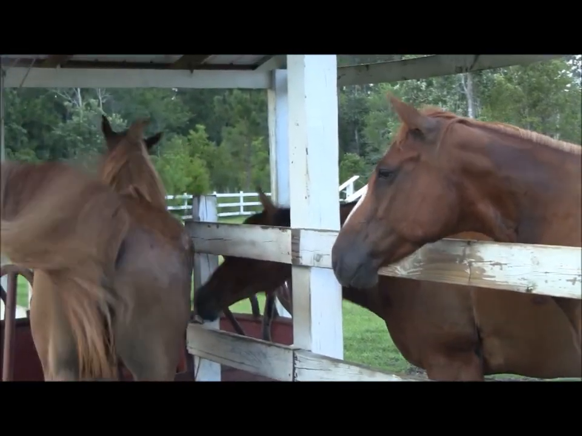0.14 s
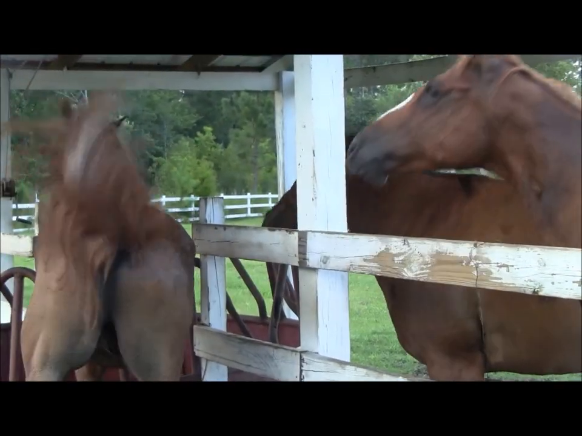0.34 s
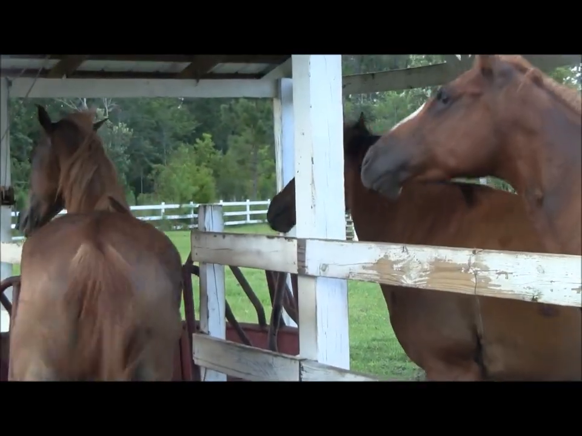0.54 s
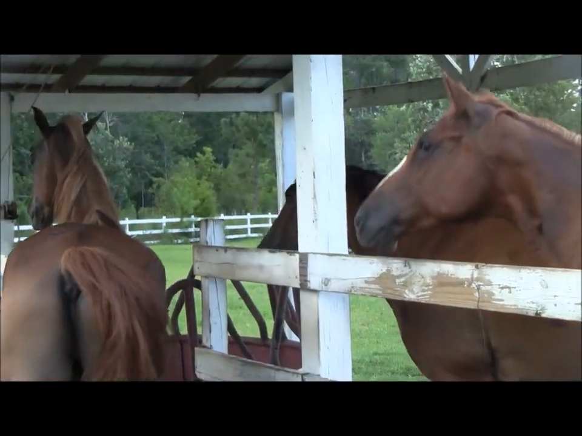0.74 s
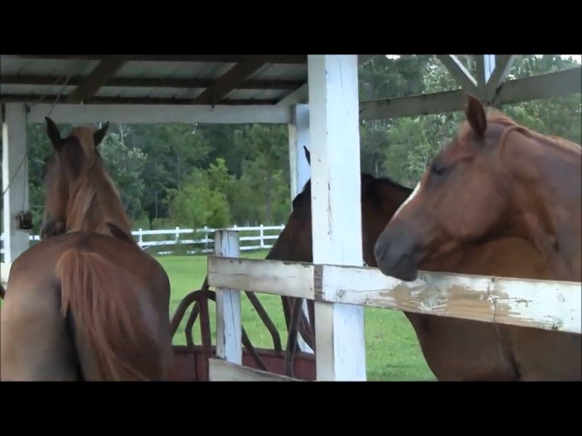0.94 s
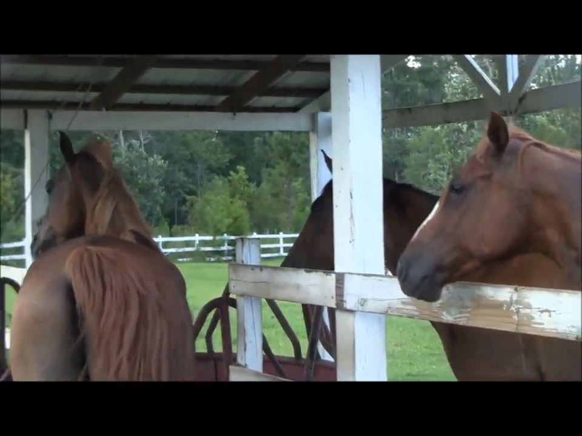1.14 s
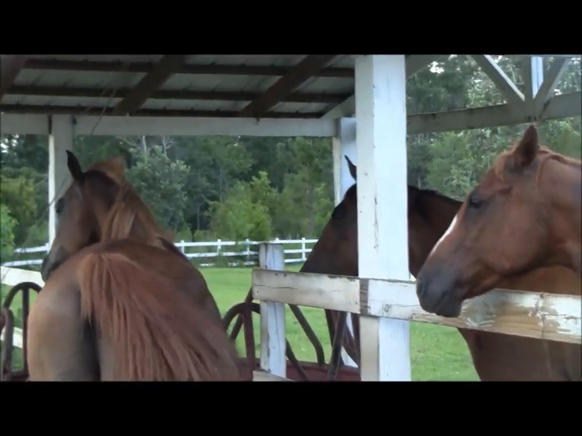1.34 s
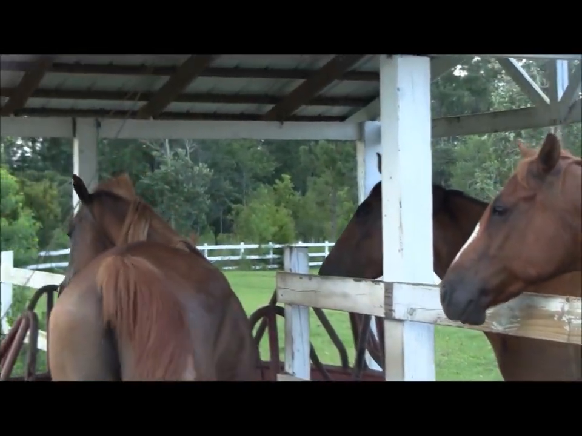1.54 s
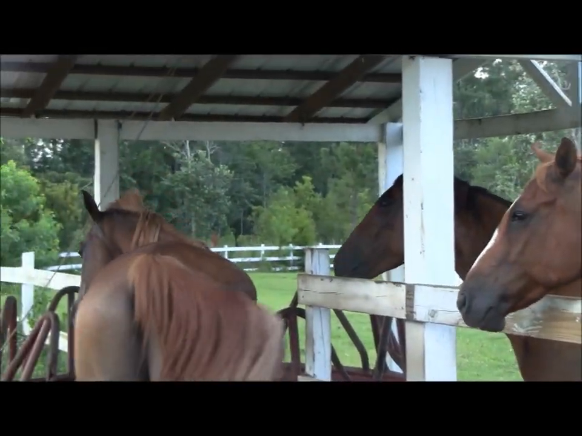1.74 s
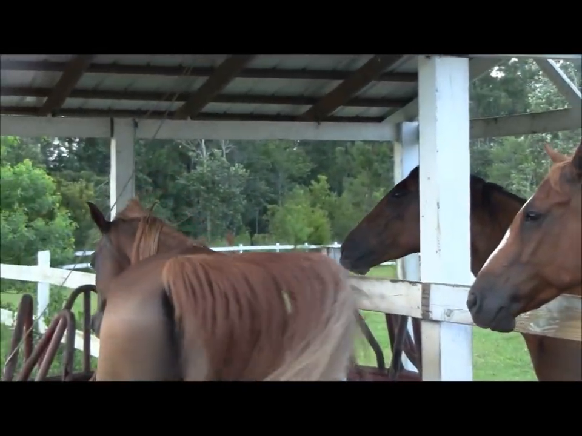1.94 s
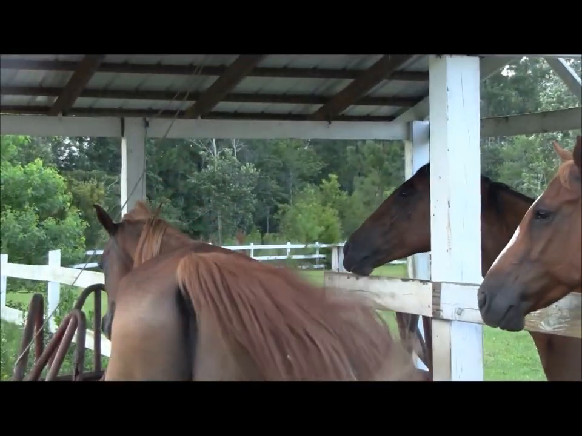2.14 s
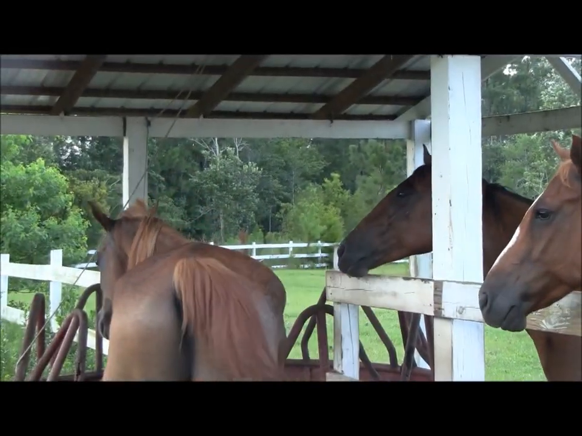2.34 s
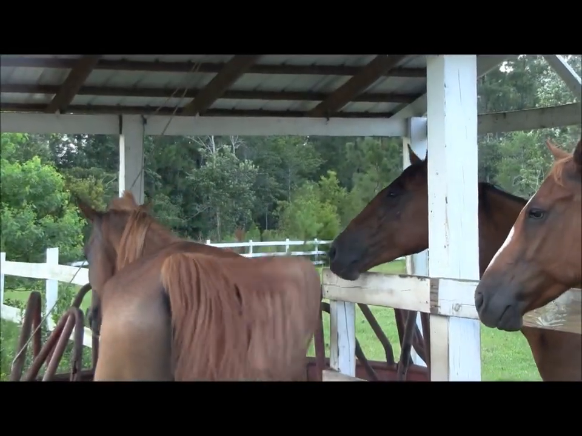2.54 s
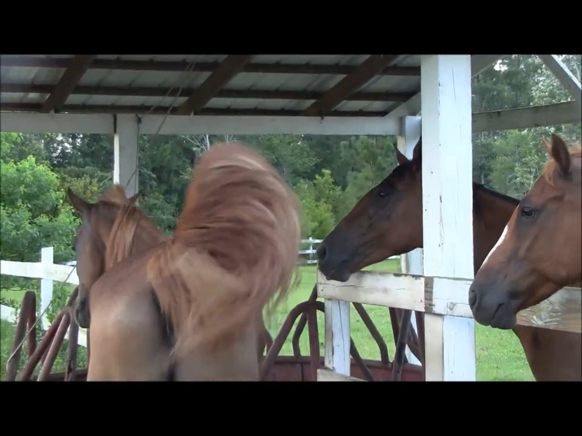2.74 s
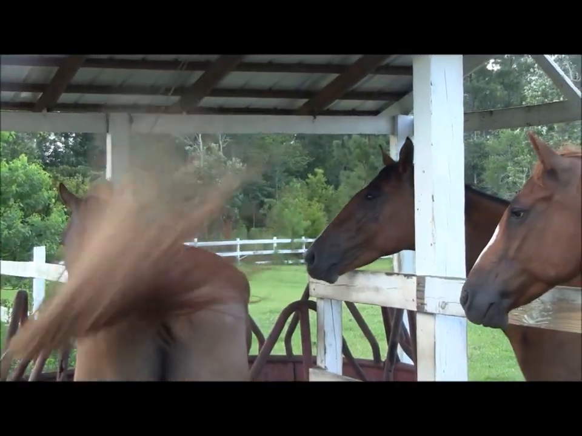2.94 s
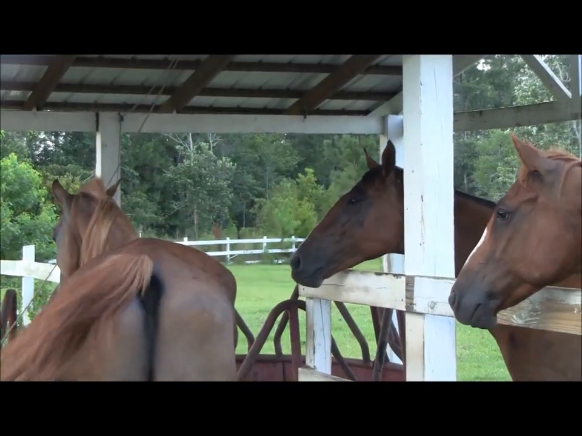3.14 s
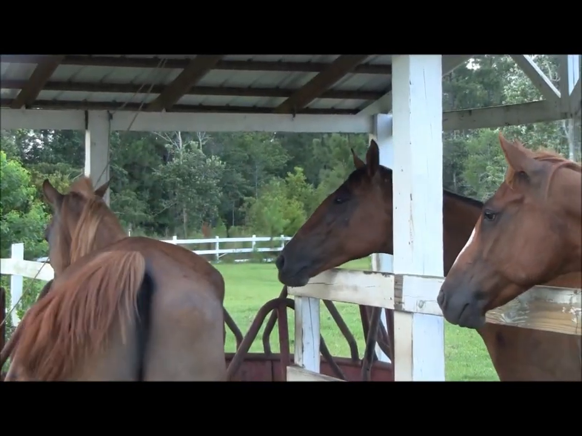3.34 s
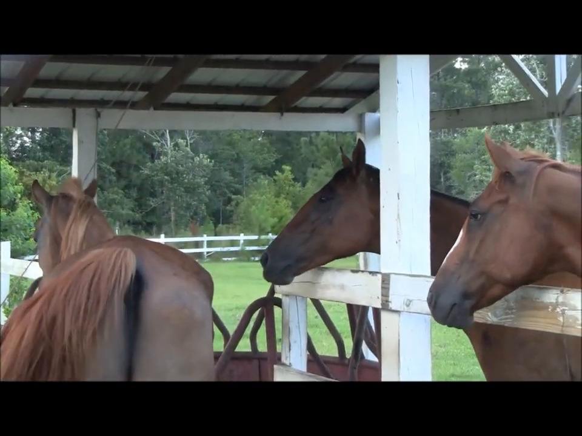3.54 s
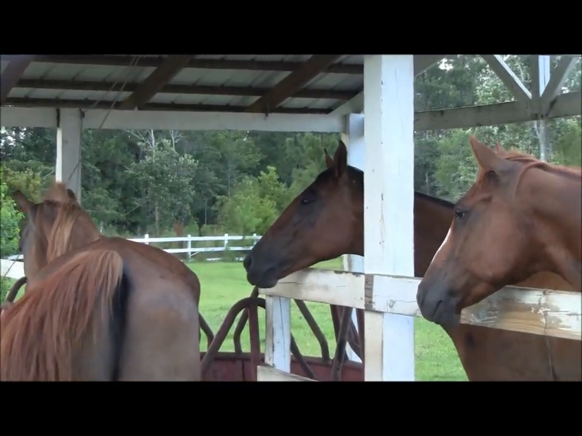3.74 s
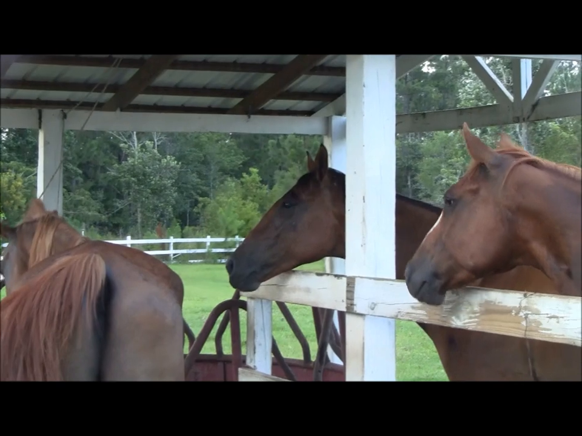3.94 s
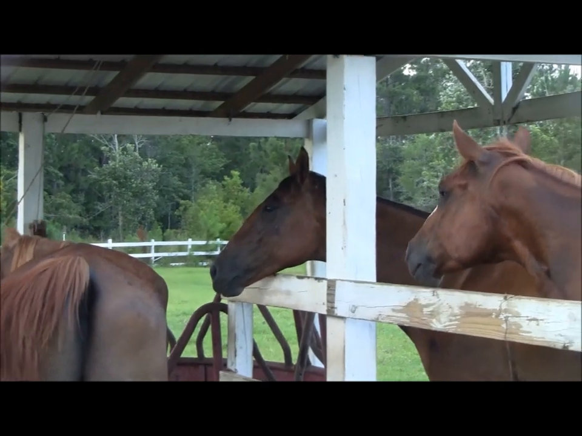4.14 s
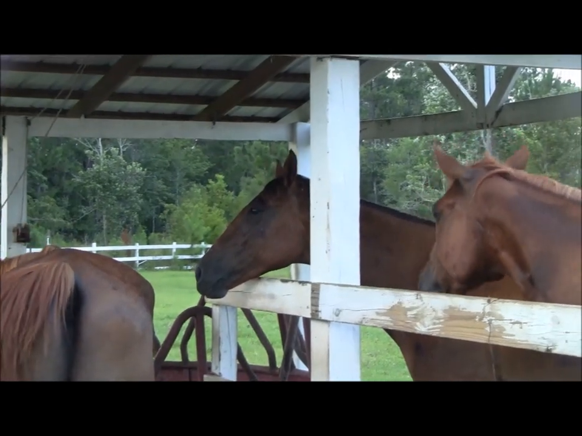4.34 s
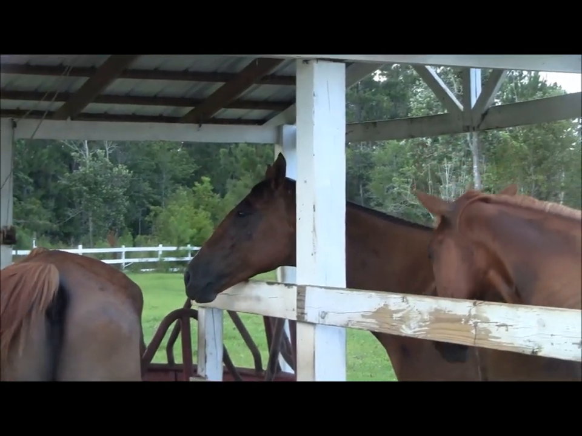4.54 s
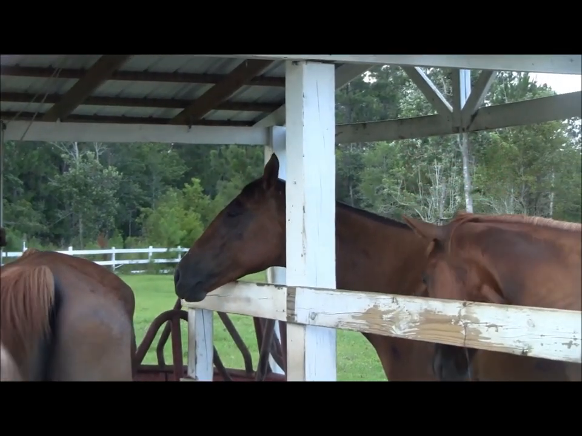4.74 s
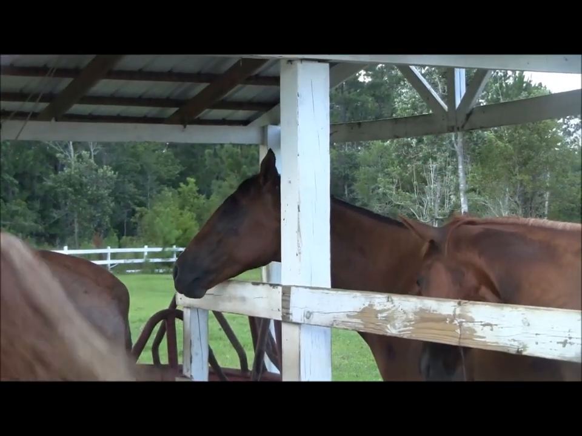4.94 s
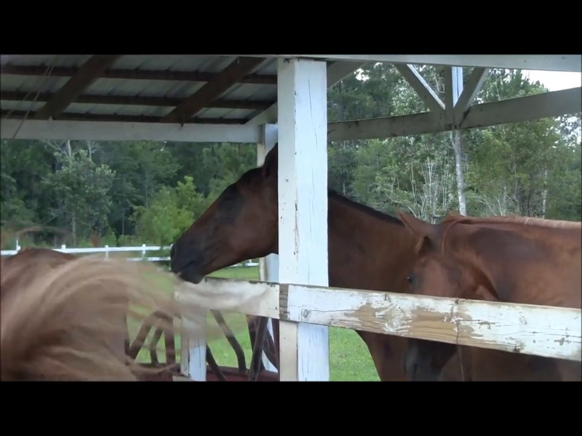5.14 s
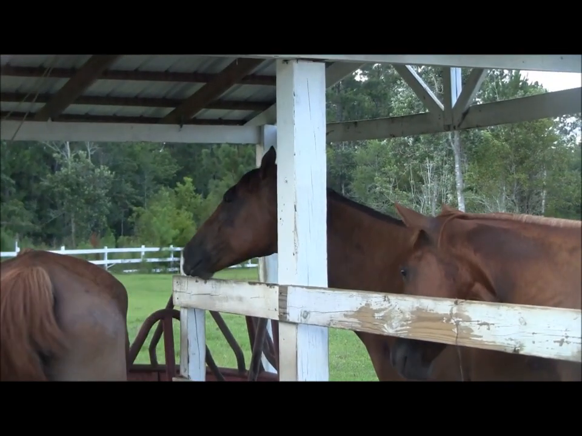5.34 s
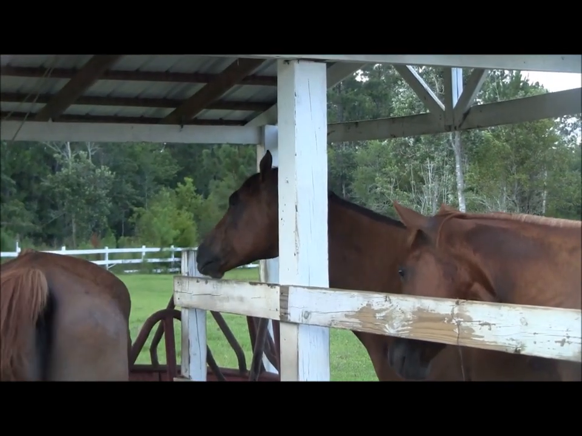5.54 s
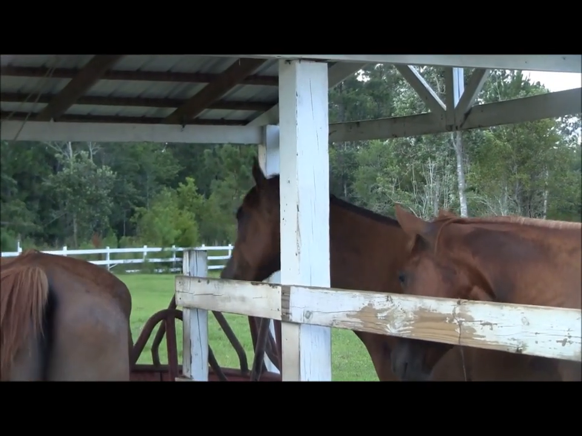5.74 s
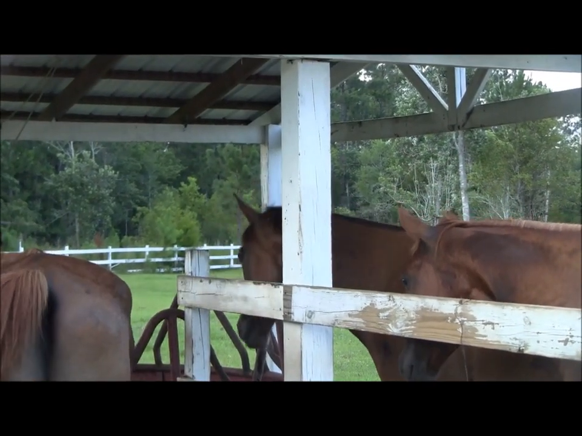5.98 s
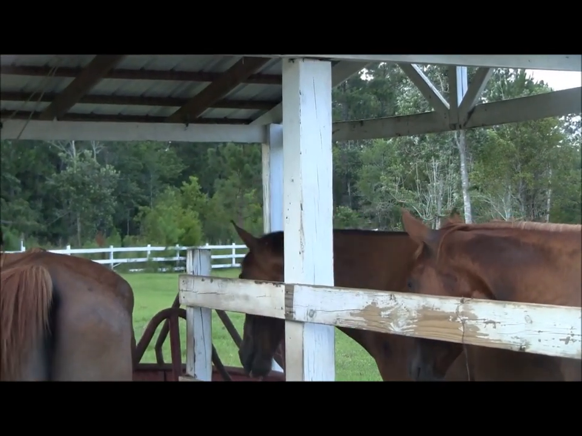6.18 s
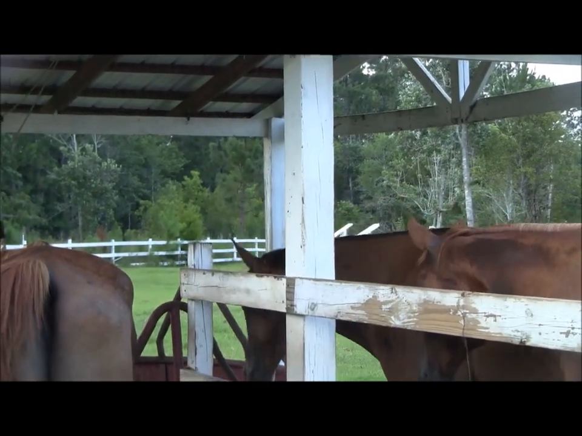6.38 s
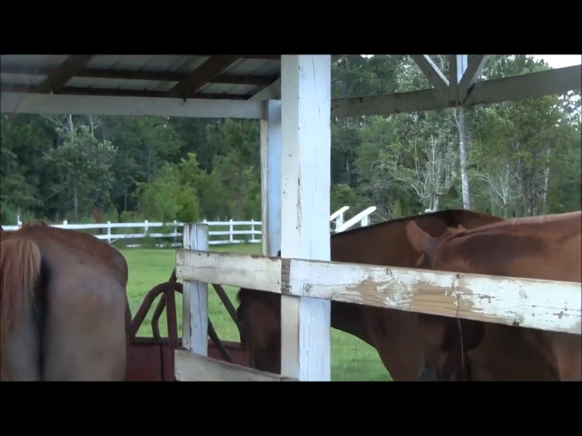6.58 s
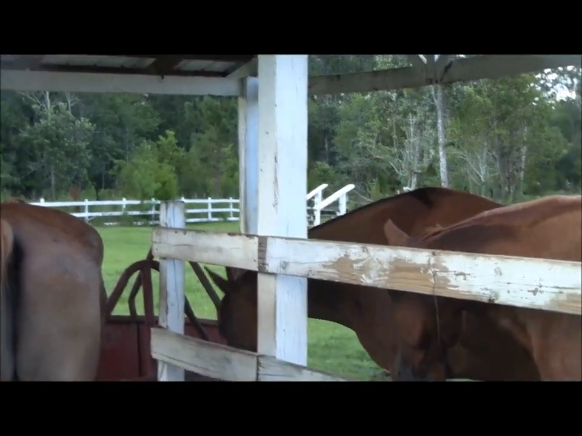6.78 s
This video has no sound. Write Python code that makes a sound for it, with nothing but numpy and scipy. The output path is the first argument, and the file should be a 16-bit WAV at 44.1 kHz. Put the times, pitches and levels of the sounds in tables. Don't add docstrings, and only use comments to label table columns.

```python
import sys
import numpy as np
from scipy import signal
from scipy.io import wavfile
from scipy.ndimage import uniform_filter1d

SR = 44100
rng = np.random.default_rng(int(sys.argv[2]) if len(sys.argv) > 2 else 0)


def generate_wav(signal):
    frames = np.transpose(np.atleast_2d(signal))
    scaled = np.clip(frames, -1, 1) * 32767
    pcm = np.round(scaled).astype(np.int16)
    wavfile.write(sys.argv[1], SR, pcm)


def magnitude_from_level(level_db):
    exponent = np.asarray(level_db, float) / 20
    return 10 ** exponent


N = 300321
T = np.arange(N) / SR
VOICE = T[:SR]

# (frequency [Hz], level [dB per Hz])
TRAFFIC = [(160, -32), (280, -5), (382, -3), (555, -5), (901, 0), (1080, -3.5), (1400, -32.5), (2380, -120)]
TYRES = [(640, -36), (1080, -3), (1300, -0.5), (1880, -11), (2100, -15), (2730, -26.5), (4620, -120)]
LEAVES = [(1240, -9), (2100, -4), (3460, -9), (4110, -11), (4730, -12), (5340, -16.5), (6400, -14.5),
          (8320, -43), (14100, -120)]
HUM = [(15, -70), (44, -50), (70, -17), (100, -13), (124, 2), (140, -0.5), (162, -7.5), (200, -1),
       (251, -8.5), (300, -10.5), (390, -41), (660, -120)]
FAR_INSECTS = [(3530, -57), (6000, -32), (6470, -27.5), (6790, -7), (7530, -7), (7960, -7), (8560, -7),
               (9450, 1.5), (10000, -2.5), (11400, -25), (11900, -45.5), (12000, -57), (13200, -60),
               (14400, -45), (15600, -53)]
# (frequency [Hz], left-right correlation [-1 to 1], lead of the left [rad])
PORTS = [(60, .97, 0), (150, .94, 0), (230, .3, 0), (300, -.35, 0), (450, -.45, 0), (700, .25, .3),
         (1200, .86, .3), (2500, .55, .2), (4700, .55, .2), (7000, .65, 0), (8000, .6, .4), (8800, .6, 2),
         (10000, .55, 2.1), (12000, .45, .8)]
# (nearest [s], half length [s], level [dB])
CARS = [
    (.8, .15, 3),
    (2.9, .4, 3.5),
    (3.68, .24, 7),
    (4.3, .1, 2.5),
    (5.3, .45, 3.5),
]
# (frequency [Hz], level [dB per Hz])
HAIR = [(1470, -37), (2500, -5.5), (3900, -12.5), (6360, -9.5), (7820, -6.5), (8500, -3), (12000, -5.5),
        (15600, -15)]
DIRT = [(59, -44), (100, -8.5), (633, -4), (831, -12), (1160, 0), (1430, -21.5), (1660, -2), (2800, -6),
        (4500, -13), (7830, -27), (15000, -46)]
# (fastest [s], peak [dB], time to rise 20 dB [s], time to fall 20 dB [s])
SWISHES = [(.14, -58, .05, .3), (.47, -65.5, .25, .25), (.6, -60, .12, .25), (.68, -59, .2, .14),
           (1.0, -71, .3, .26), (1.4, -67, .12, .15), (1.52, -63, .11, .08), (1.7, -69, .12, .12),
           (1.917, -61, .03, .07), (1.98, -69, .2, .12), (2.5, -67, .08, .05), (2.67, -62, .05, .05),
           (2.8, -69, .28, .2), (3.033, -51.5, .06, .05), (3.07, -57, .15, .04), (3.12, -64, .15, .15),
           (3.16, -55, .05, .12), (3.26, -62, .15, .06), (4.5, -75, .6, .03), (4.98, -70, .55, .05),
           (5.018, -53, .025, .09), (5.07, -57, .05, .15), (5.1, -58, .2, .025), (5.372, -53, .025, .07),
           (5.41, -55, .04, .05), (5.46, -65, .1, .05), (5.54, -63, .12, .1), (5.575, -53, .03, .03),
           (5.62, -62, .15, .035), (6.045, -66, .03, .05), (6.11, -75, .24, .08), (6.21, -79.5, .1, .1),
           (6.72, -75, .2, .15)]
# (start [s], length [s], level [dB])
SCUFFS = [
    (.125, .08, -33),
    (1.365, .07, -51),
    (.67, .03, -55),
    (3.045, .07, -57),
    (5.006, .04, -48),
    (5.054, .05, -51),
]
# (time [s], pitch [Hz], level [dB], second partial over the first [dB])
YELP = [(.152, 711, -38, -14), (.165, 693, -35, -6), (.19, 647, -25, 6), (.199, 640, -26, 8)]
NOTE = [(.2, 664.5, -40, 9), (.211, 669, -27, -6), (.224, 678, -12.5, -21), (.236, 664, -17.5, -10),
        (.27, 621, -16.5, -11), (.285, 626, -16, -12), (.297, 619, -14.5, -16), (.325, 604, -15.5, -16),
        (.34, 598, -23, -20)]
# (multiple of the pitch [1], level [dB])
UPPER = [(4, 2.5), (5, -3.5), (6, -8), (7, -13.5), (8, -18)]
# (frequency [Hz], width [Hz], level over the first [dB])
LIFT = [(1810, 18, -13), (2000, 40, -14)]
# (start [s],
# length [s], first pitch [Hz], last pitch [Hz], level [dB])
NOSE = [(.335, .04, 1614, 1590, -23), (.366, .03, 1555, 1520, -23), (.39, .05, 1510, 1490, -23),
        (.432, .03, 1480, 1490, -20), (.601, .048, 1480, 1455, -27), (.64, .03, 1460, 1450, -40),
        (.345, .045, 1740, 1700, -26), (.385, .05, 1805, 1785, -27), (.43, .07, 1795, 1715, -32),
        (.34, .055, 570, 545, -25), (.388, .045, 525, 500, -25), (.425, .065, 570, 620, -28),
        (.176, .035, 1965, 1925, -32), (.184, .04, 2610, 2560, -36), (.298, .06, 2460, 2415, -36),
        (.26, .06, 2950, 3080, -42), (.33, .085, 3500, 3400, -46), (.29, .05, 4380, 4250, -50),
        (.375, .04, 4300, 4200, -50), (.372, .07, 2745, 2700, -45), (.385, .05, 3900, 3900, -51),
        (.44, .055, 2450, 2480, -41), (.44, .05, 3460, 3460, -51), (.6, .045, 2620, 2560, -52),
        (.605, .035, 4550, 4500, -64), (.725, .04, 3950, 3900, -69)]
# (time [s], pitch [Hz], level [dB])
WHISTLE = [(.221, 1040, -24), (.287, 985, -38), (.322, 1040, -34), (.332, 1010, -15), (.375, 995, -16.5),
           (.412, 928, -19), (.432, 1022, -18.5), (.45, 1008, -22), (.462, 1015, -39)]
AFTER_TONE = [(.476, 1013, -37), (.49, 1010, -30), (.535, 1000, -38), (.56, 940, -46), (.591, 1017, -41),
              (.61, 1015, -37)]
# (multiple of the folds [1], multiple of the whistle [1], level over the whistle [dB])
MIXING = [(1, 1, 1), (-1, 2, 0), (2, 1, -9.5), (-1, 3, -26)]
# (time [s], effort [dB], noise share [0-1])
GROWL = [(.205, -31, .75), (.238, -27.5, .8), (.31, -33, .8), (.338, -20, .4), (.38, -23, .45),
         (.455, -23.5, .4), (.464, -31, .7), (.5, -36, .6), (.535, -46, .7)]
# (frequency [Hz], width [Hz], level [dB])
THROAT = [(410, 100, -12), (570, 114, -5.5), (735, 107, -2.5), (860, 100, -6.5), (1080, 140, -0.5),
          (1380, 260, -9), (1740, 200, -1), (2014, 30, -8.5), (2500, 130, -11), (3500, 660, -17.5),
          (4360, 600, -22.5), (6200, 1300, -30.5)]
# (start [s], pitch [Hz], level [dB], length [s], growling rasp [dB])
GRUNTS = [
    (.588, 569, -34.5, .062, -45),
    (.72, 552, -39, .038, -52),
]
# (time [s], peak [dB], top end over the peak [dB])
SNAPS = [
    (0.679, -42, -12),
    (1.9133, -34, -22),
    (2.6564, -61, -8),
    (4.459, -33.5, -26),
    (5.012, -33.5, -9),
    (5.0668, -32, -14),
    (5.368, -45, -1),
    (5.5722, -37, -8),
    (6.0364, -38.5, -14),
]
# (time [s], pitch [Hz], level [dB])
BIRD = [(6.28, 3700, -80), (6.31, 3520, -65), (6.36, 3270, -65), (6.4, 3070, -68), (6.42, 2960, -80),
        (6.44, 2850, -65), (6.48, 2660, -59), (6.565, 2220, -57), (6.578, 2160, -76)]

FULL_DB, DUCK_S, DUCK_DB, DEEPEST_S, DEEPEST_DB = -51.3, .202, -59.5, .45, -68.5
QUICK_DB, QUICK_S, CREEP_DB, CREEP_CURVE = 9.4, .14, .75, 1.7
ROAR_DB, TYRES_DB, HUM_DB, FAR_INSECTS_DB, ROAD_THINS_DB_PER_S = 4.6, 3.8, 6.3, 2, .55
STILL_DB = -84
THIRD_DB, UPPER_DB, UPPER_GROWS_DB_PER_S = -28, -43, 120
BREAK_S, THROB, THROB_GROWS_PER_S, THROB_DECAY_CYCLES = .331, .35, 3, .7
NOSE_RISE_S, NOSE_FADE_DB = .008, 11
RASP_ABOVE_HZ, RASP, CALM_S, CALM = 2200, .4, .55, .3
PULSES_PER_S, SLOWING_PER_S2, SLOWEST_PER_S = 110, 415, 80
MOUTH, MUTTER_DB, LAST_S = .975, -48, .67
GRUNT_RISE_S, GRUNT_FADE_DB, GRUNT_SECOND_DB = .02, 16, 4.5
MIC_LOW_HZ = 46


def evened(x):
    return x / np.sqrt(np.mean(x ** 2) + 1e-20)


def read(points, hz):
    f, *values = np.transpose(points)
    return [np.interp(np.log(hz + 1), np.log(f + 1), v) for v in values]


def columns(rows, t=T):
    s, *values = np.transpose(rows)
    return [uniform_filter1d(np.interp(t, s, v), size=130) for v in values]


def gate(rows, fade=0.0044, t=VOICE):
    return np.clip(np.minimum(t - rows[0][0], rows[-1][0] - t) / fade, 0, 1)


def envelope(start, length, rise, fade_db):
    u = np.clip((VOICE - start) / length, 0, 1)
    onset = np.clip((VOICE - start) / rise, 0, 1) ** 2
    release = np.clip((1 - u) * length / .004, 0, 1)
    return onset * magnitude_from_level(-fade_db * u ** 2) * release


def phase(hz):
    return 2 * np.pi * np.cumsum(hz) / SR


def wander(seconds, count=N):
    size = int(seconds * SR)
    return evened(uniform_filter1d(uniform_filter1d(rng.standard_normal(count), size), size))


def resonate(x, hz, width):
    turn, r = np.exp(1j * phase(np.full(len(x), hz * 1.))), np.exp(-np.pi * width / SR)
    return 2 * (turn * signal.lfilter([1 - r], [1, -r], x / turn)).real


def noise(spectrum, patchy_db, focus=0., size=1024):
    hz = np.fft.rfftfreq(size, 1 / SR)
    a, b, c, d, patches = rng.standard_normal((4 * N // size + 5, len(hz), 5), dtype=np.float32).T
    patches = evened(uniform_filter1d(uniform_filter1d(patches, 8, axis=0), 14336 // size, axis=1))
    same, lead = read(PORTS, hz[:, None])
    same = np.clip(same + focus * (1 - same), -1, 1)
    left = a + 1j * b
    shared = same * left * np.exp(-1j * lead * (1 - focus))
    right = shared + np.sqrt(1 - same ** 2) * (c + 1j * d)
    z = np.array([left, right]) * magnitude_from_level(read(spectrum, hz[:, None])[0] + patchy_db * patches)
    return evened(signal.istft(z, nperseg=size, noverlap=3 * size // 4)[1][:, :N])


def shed(x):
    t = np.arange(6000) / SR
    signs = rng.choice([-1., 1.], (2, 6000))
    taps = signs * (rng.random((2, 6000)) < .05) * magnitude_from_level(-60 * t / 0.28) * (t > .004)
    return signal.fftconvolve(x[None], taps / np.linalg.norm(taps[0]), axes=1)[:, :N]


def recorder_gain_db():
    after = np.maximum(T - DEEPEST_S, 0)
    back_db = QUICK_DB * (1 - np.exp(-after / QUICK_S)) + CREEP_DB * after ** CREEP_CURVE
    sink_db = np.interp(T, [DUCK_S - .004, DUCK_S + .004, DEEPEST_S], [FULL_DB, DUCK_DB, DEEPEST_DB])
    return np.minimum(sink_db + back_db, FULL_DB)


def road():
    thins_db = ROAD_THINS_DB_PER_S * T + 3 * (T < DEEPEST_S)
    cars_db = sum(db * np.exp(-((T - s) / half) ** 2) for s, half, db in CARS)
    traffic_db = ROAR_DB - thins_db + .3 * cars_db
    tyres_db = TYRES_DB - thins_db + cars_db
    hum_db = HUM_DB - 1.9 * ROAD_THINS_DB_PER_S * T - 3 * (T < DEEPEST_S)
    far = magnitude_from_level(traffic_db + 4.0) * noise(TRAFFIC, patchy_db=1.5)
    far += magnitude_from_level(tyres_db + 3.5) * noise(TYRES, patchy_db=0.5)
    far += magnitude_from_level(hum_db) * noise(HUM, patchy_db=0.5, size=4096)
    return far + magnitude_from_level(-1 - thins_db) * noise(LEAVES, patchy_db=1.5)


def near_cricket(start=-.005, beat=.01975, squeeze=.0025, paired=.62, slop=0.00038):
    draw, strikes = rng.random((400, 3)), np.zeros(N + SR)
    pair = draw[:, 0] < paired
    beats = np.cumsum(1 + pair) - 1 - pair
    slip = slop * (2 * draw[:, 1] - 1)
    beats = beats + .5 + 0.26 * wander(0.18)[::N // 400][:400]
    first = beats * beat + squeeze * pair + slip
    second = ((beats + 1) * beat - squeeze + slip)[pair]
    times = np.r_[first, second] + start
    times = times[(times > 0) & (times < N / SR)]
    force = draw[:len(times), 2]
    strikes[(times * SR).astype(int)] = magnitude_from_level(2 * force) * (force > .012)
    t = np.arange(400) / SR
    shape = np.exp(-((t - .0022) / .0014) ** 2) + .85 * np.exp(-((t - .0058) / .0016) ** 2)
    stroke = shape * np.sin(2 * np.pi * (8000 * t - 28000 * t ** 2))
    x = signal.oaconvolve(strikes, stroke)[:N]
    return evened(np.array([x, magnitude_from_level(.8) * np.roll(x, 6)]) + 0.17 * shed(x))


def buzzer(hz, width, rate, sharp, lag):
    strokes = np.exp(sharp * np.cos(phase(rate * (1 + 0.0059 * wander(0.45)))))
    x, other = (evened(resonate(resonate(strokes * n, hz, width), hz, width))
                for n in rng.standard_normal((2, N)))
    return np.array([x, 1.17 * np.roll(x, round(lag)) + 0.96 * other])


def pasture():
    insects = magnitude_from_level(1.2) * near_cricket() + magnitude_from_level(FAR_INSECTS_DB) * noise(FAR_INSECTS, patchy_db=1.5)
    insects += magnitude_from_level(-7.5) * buzzer(9840, 280, 66.5, 1.1, lag=6)
    chirr_db = -19.5 - 9.3 * np.clip(T - 5.7, 0, 1)
    insects += magnitude_from_level(chirr_db) * buzzer(4770, 200, 25.0, 1.3, lag=0)
    insects += magnitude_from_level(-13) * buzzer(7130, 140, 50.0, .3, lag=0)
    return magnitude_from_level(recorder_gain_db()) * (road() + insects)


def tail_swishes():
    at = T[::32, None]
    s, db, rise, fall = np.transpose(SWISHES)
    strokes_db = db - 20 * np.maximum((s - at) / rise, (at - s) / fall)
    swish_db = np.maximum(strokes_db, STILL_DB).max(axis=1)
    swish_db = uniform_filter1d(np.interp(T, at[:, 0], swish_db), size=300)
    level_db = swish_db + 7.0 + 1.1 * wander(.002) + 1.3 * wander(0.012)
    return magnitude_from_level(level_db) * noise(HAIR, patchy_db=2., focus=0.17) * magnitude_from_level([[1.2], [-1.2]])


def hoof_scuffs():
    shape = sum(magnitude_from_level(db) * np.sin(np.pi * np.clip((T - s) / length, 0, 1) ** 0.45) ** .6
                for s, length, db in SCUFFS)
    return shape * magnitude_from_level(2 * wander(0.0027)) * noise(DIRT, patchy_db=2.5, focus=0.98)


def folds(rows):
    hz, db, second_db = columns(rows, VOICE)
    turn = phase(hz * (1 + .004 * wander(0.0035, count=SR)))
    third = magnitude_from_level(THIRD_DB) + sum(magnitude_from_level(up_db) / (1 + ((3 * hz - f) / w) ** 2) for f, w, up_db in LIFT)
    upper = 0
    for k, up_db in UPPER:
        level = magnitude_from_level(up_db + 2.5 * wander(.012, count=SR)) * (1 + .7 * wander(0.0019, count=SR))
        upper = upper + level * np.cos(k * turn)
    grown_db = UPPER_DB + UPPER_GROWS_DB_PER_S * (VOICE - NOTE[0][0]).clip(0, 1)
    upper = upper * magnitude_from_level(np.maximum(second_db - 31, grown_db))
    flutter = 1 + .45 * gate(NOTE, .02) * wander(.002, count=SR)
    middle = magnitude_from_level(second_db) * np.sin(2 * turn) + third * np.cos(3 * turn)
    return np.sqrt(2) * gate(rows) * magnitude_from_level(db) * (np.cos(turn) + flutter * middle + upper), turn


def flaps():
    rate = np.clip(PULSES_PER_S - SLOWING_PER_S2 * (VOICE - BREAK_S), SLOWEST_PER_S, PULSES_PER_S)
    turns = phase(rate) / (2 * np.pi)
    return turns - np.interp(BREAK_S, VOICE, turns) + .12 + .09 * wander(.006, count=SR)


def held_tones(throb, unrest):
    out = 0
    for start, length, first_hz, last_hz, db in NOSE:
        hz = np.interp(VOICE, [start, start + length], [first_hz, last_hz])
        hz = hz * (1 + 0.005 * unrest * wander(0.0035, count=SR))
        rasp = RASP * wander(.0015, count=SR) if first_hz > RASP_ABOVE_HZ else 0
        level = (1 + rasp) * magnitude_from_level(db + 2 * unrest * wander(0.0033, count=SR))
        level = level * envelope(start, length, NOSE_RISE_S, NOSE_FADE_DB * unrest)
        out = out + np.sqrt(2) * level * throb * np.cos(phase(hz))
    return out


def larynx_whistle(fold_turn, throb):
    hz, db = columns(WHISTLE + AFTER_TONE, VOICE)
    turn = phase(hz * (1 + 0.016 * wander(0.0039, count=SR)))
    mixed = sum(magnitude_from_level(up_db) * np.cos(m * fold_turn + n * turn) for m, n, up_db in MIXING)
    voiced = np.cos(turn) * throb + gate([WHISTLE[0], [BREAK_S]], 0.009) * mixed
    return np.sqrt(2) * magnitude_from_level(db) * gate(WHISTLE + AFTER_TONE) * voiced


def squeal(turns):
    note, fold_turn = folds(YELP + NOTE)
    kick = uniform_filter1d(np.exp(-(turns % 1) / THROB_DECAY_CYCLES), size=110)
    depth = THROB + THROB_GROWS_PER_S * (VOICE - BREAK_S)
    throb = 1 + depth * gate([[BREAK_S], WHISTLE[-1]]) * (evened(kick) - 1)
    unrest = np.where(VOICE < CALM_S, 1, CALM)
    throb += .2 * unrest * wander(0.0057, count=SR)
    return note + held_tones(throb, unrest) + larynx_whistle(fold_turn, throb)


def growl(turns):
    effort_db, rough = columns(GROWL, VOICE)
    effort = magnitude_from_level(np.maximum(effort_db, MUTTER_DB)) * gate([GROWL[0], [LAST_S]], .02)
    effort += sum(magnitude_from_level(db) * envelope(s, length + .01, GRUNT_RISE_S, 14) for s, _, _, length, db in GRUNTS)
    whole = np.floor(turns)
    pulses = np.maximum(np.diff(whole, prepend=whole[0]), 0) * magnitude_from_level(1.2 * wander(0.0099, count=SR))
    pulses = signal.sosfilt(signal.butter(4, 2100, fs=SR, output="sos"), pulses)
    puffs = (.5 + np.exp(-(turns % 1) / .5)) * rng.standard_normal(SR)
    rough = np.clip(rough, 0, 1)
    drive = (1 - rough) * 0.2 * evened(pulses) + rough * evened(puffs)
    throat = 0
    for k, (f, w, db) in enumerate(THROAT):
        ring = resonate(resonate(drive, f * MOUTH, 1.5 * w), f * MOUTH, 1.5 * w)
        throat = throat + (-1) ** k * magnitude_from_level(db) / np.sqrt(w) * ring
    throat = signal.sosfilt(signal.butter(6, 350, "highpass", fs=SR, output="sos"), throat)
    return effort * evened(throat)


def grunts():
    out = 0
    for start, hz, db, length, _ in GRUNTS:
        turn = phase(hz * (1 + .006 * wander(.004, count=SR)))
        upper = sum(magnitude_from_level(up_db) * np.cos(k * turn) for k, up_db in UPPER)
        tone = np.cos(turn) + magnitude_from_level(GRUNT_SECOND_DB) * np.sin(2 * turn) + magnitude_from_level(-22) * upper
        out = out + np.sqrt(2) * magnitude_from_level(db) * envelope(start, length, GRUNT_RISE_S, GRUNT_FADE_DB) * tone
    return out


def snaps():
    out, t = np.zeros((2, N)), np.arange(1200) / SR
    dull = signal.butter(2, [1200, 3400], "band", fs=SR, output="sos")
    bright = signal.butter(2, [9000, 15500], "band", fs=SR, output="sos")
    decay = magnitude_from_level(-60 * t / 0.0033) + .3 * magnitude_from_level(-60 * t / .05)
    for (s, db, top_db), grit in zip(SNAPS, rng.standard_normal((len(SNAPS), 1200))):
        crack = evened(signal.sosfilt(dull, grit)) + magnitude_from_level(top_db) * evened(signal.sosfilt(bright, grit))
        out[:, round(s * SR):][:, :1200] += magnitude_from_level(db - 5.5) * crack * decay
    return out


def board_knock():
    after = np.maximum(T - 4.81, 0)
    return magnitude_from_level(-43 - 60 * after / 0.13) * np.sin(2 * np.pi * 600 * after) * np.minimum(after / .008, 1)


def bird():
    hz, db = columns(BIRD)
    return np.sqrt(2) * magnitude_from_level(db - 1 + 1.5 * wander(.008)) * gate(BIRD, t=T) * np.sin(phase(hz))


def scene():
    turns = flaps()
    horse = squeal(turns) + growl(turns) + grunts()
    calls = np.pad(horse, (0, N - SR)) + bird()
    voices = calls * magnitude_from_level([[.25], [-.25]]) + magnitude_from_level(-20.5) * shed(calls)
    return voices + pasture() + tail_swishes() + hoof_scuffs() + snaps() + board_knock()


def band_limit(x):
    return signal.sosfilt(signal.butter(12, 15710, fs=SR, output="sos"), x)


def record(dry):
    heard = signal.sosfilt(signal.butter(3, MIC_LOW_HZ, "highpass", fs=SR, output="sos"), dry)
    return band_limit(heard)


dry = scene()
out = record(dry)
generate_wav(out)
```